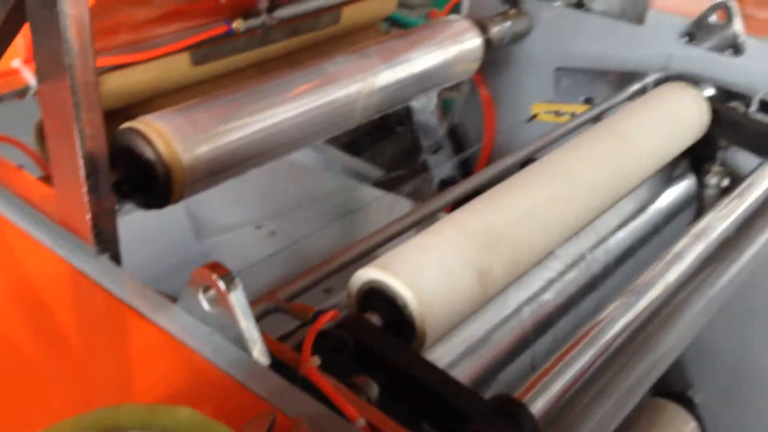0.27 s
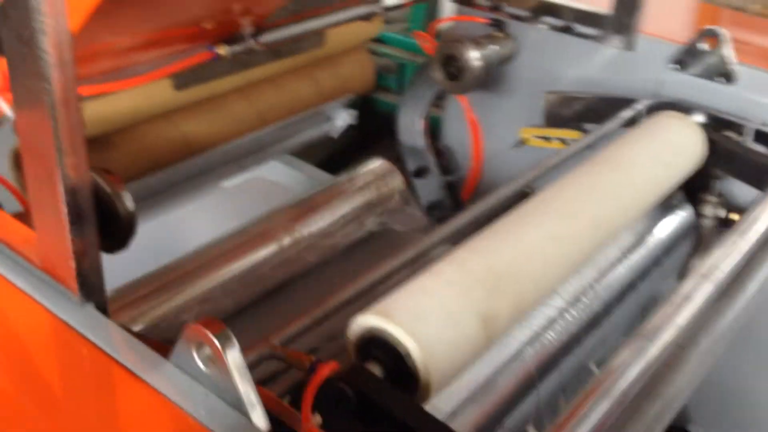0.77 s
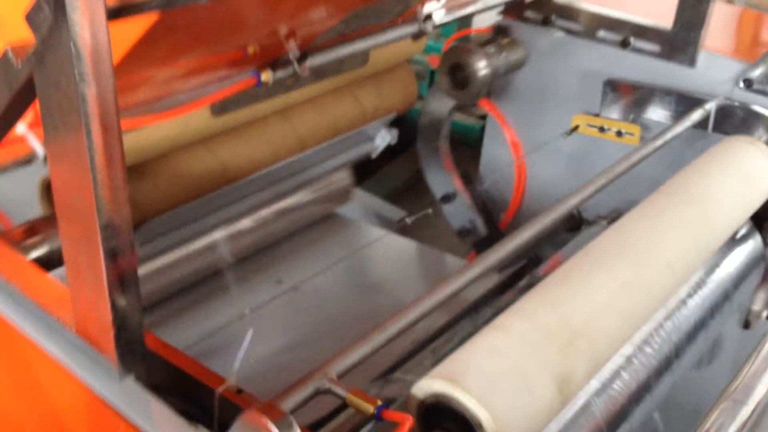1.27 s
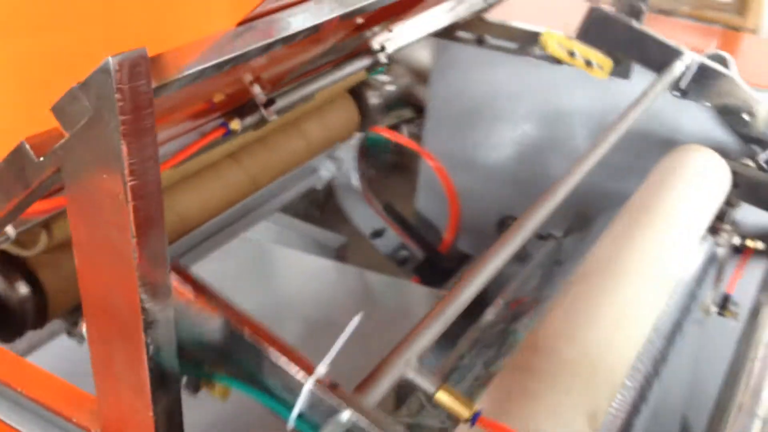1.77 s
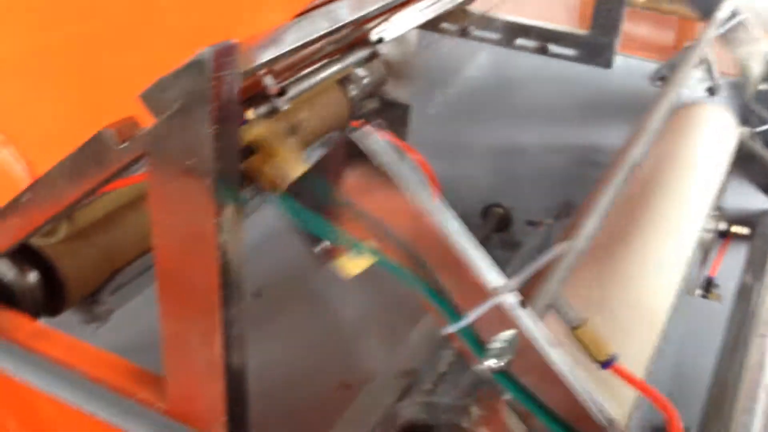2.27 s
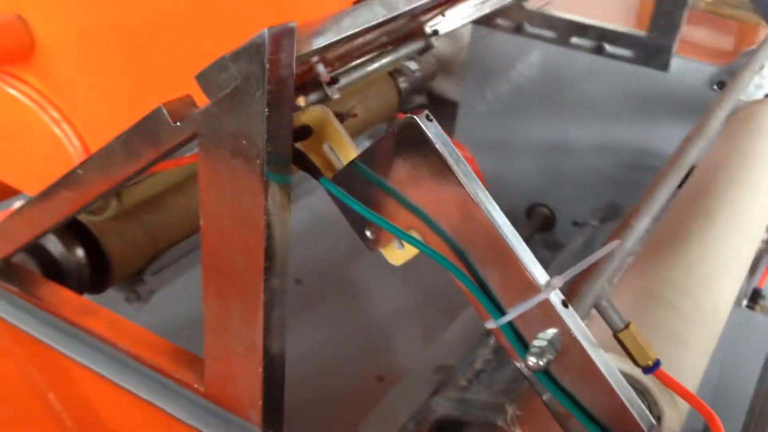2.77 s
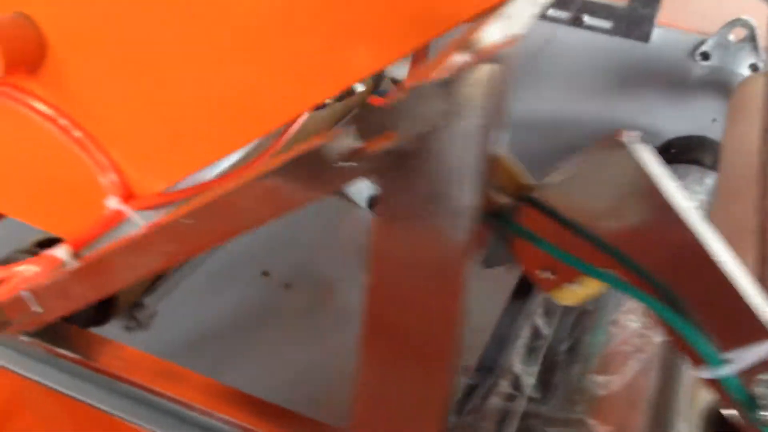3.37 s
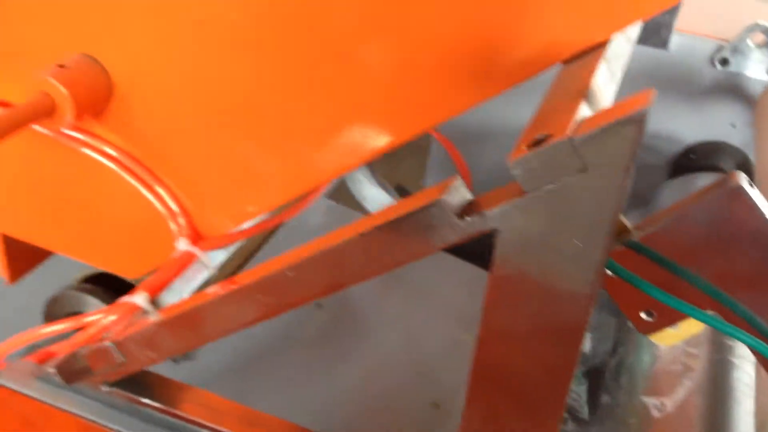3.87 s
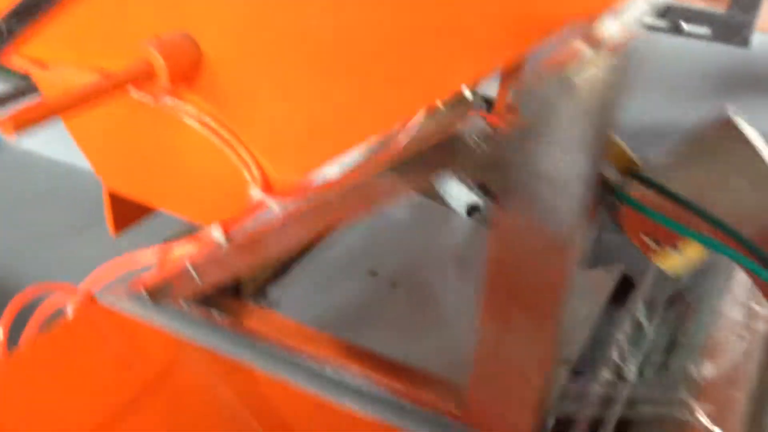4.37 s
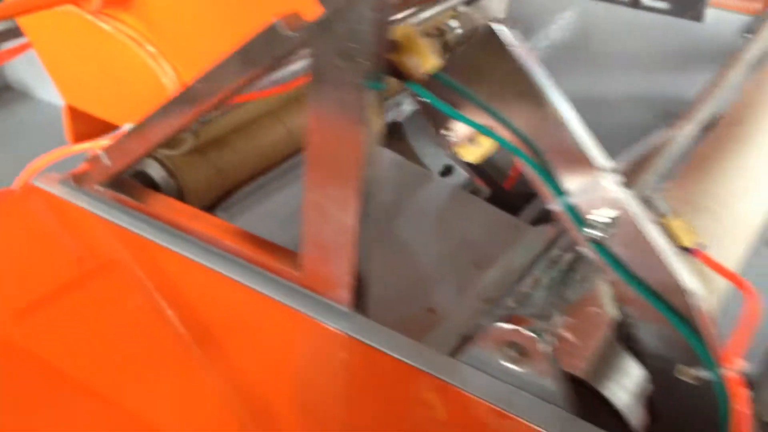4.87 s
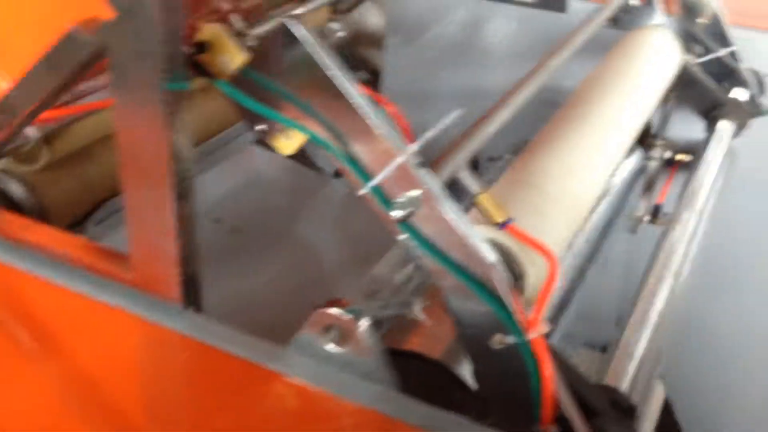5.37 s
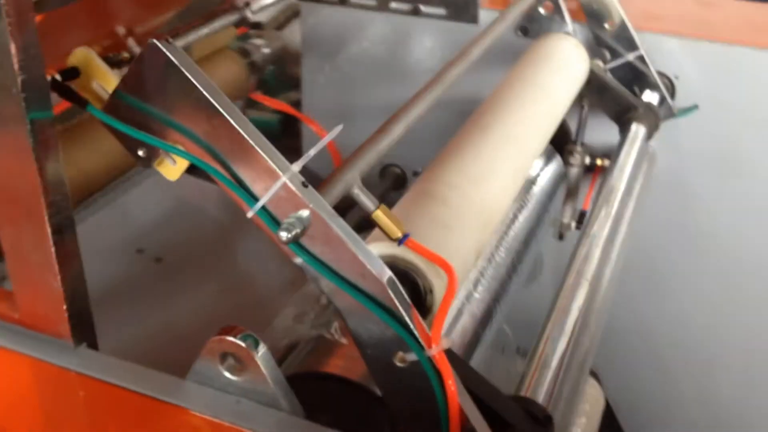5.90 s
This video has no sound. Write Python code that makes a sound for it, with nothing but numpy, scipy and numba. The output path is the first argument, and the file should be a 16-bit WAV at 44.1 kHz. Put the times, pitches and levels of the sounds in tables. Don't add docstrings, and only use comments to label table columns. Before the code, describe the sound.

A rewinding machine heard close up on a phone in an echoing workshop. Air hisses, a blade snaps drily, and a full roll lands with a loud clattering crash and bounces. An arm slams, scrapes and clicks along, then hits its stop with a low ring. Clamp, chuck and latch knock shut with brief air puffs, over hum and thin whine.

```python
import sys
import numpy as np
from scipy import signal
from scipy.fft import rfft, irfft, next_fast_len
from scipy.io import wavfile
from scipy.ndimage import uniform_filter1d
from numba import njit

SR = 44100
rng = np.random.default_rng(int(sys.argv[2]) if len(sys.argv) > 2 else 0)


def file_out(sig):
    cols = np.atleast_2d(sig).T
    lim = np.clip(cols, -1, 1)
    pcm = np.round(lim * 32767).astype(np.int16)
    wavfile.write(sys.argv[1], SR, pcm)


def ratio(d):
    e = np.asarray(d, float) / 20
    return 10 ** e


N = 270774
TIME = np.arange(N) / SR

# pitch_hz [Hz], level_db [dB], fade_s [s to fall 60 dB]
FRAME_MODES = [(157.5, -4.5, 0.39), (227.5, 4.5, 0.21), (268, 5.5, 0.26), (397, -9, 0.22), (458, -7, 0.23),
               (546, 3, 0.25), (740, -4.5, 0.089), (857, -3, 0.074), (996, -8, 0.094), (1640, -24, 0.075),
               (1790, -22, 0.089), (2200, -28, .06)]


def noise():
    return rng.standard_normal(N)


def unit(x):
    return x / np.sqrt(np.mean(x ** 2))


def band(x, lo_hz, hi_hz):
    sos = signal.butter(2, [lo_hz, hi_hz], "band", fs=SR, output="sos")
    return signal.sosfilt(sos, x) * np.sqrt(SR / 2 / (hi_hz - lo_hz))


def colour(x, points):
    hz, db = np.transpose(points)
    size = next_fast_len(N)
    bins_hz = np.arange(size // 2 + 1) * SR / size + 1
    gain = ratio(np.interp(np.log(bins_hz), np.log(hz), db))
    return irfft(rfft(x, size) * gain, size)[:N]


def ring(x, hz, t60):
    r = np.exp(-np.log(1000) / (t60 * SR))
    return signal.lfilter([1 - r, 0, r - 1], [1, -2 * r * np.cos(2 * np.pi * hz / SR), r * r], x)


def walk(rate):
    hold = int(SR / rate)
    steps = np.repeat(rng.standard_normal(N // hold + 1), hold)
    return 1.46 * uniform_filter1d(uniform_filter1d(steps, hold), hold)[:N]


def stroke(s, db, hold_s, release_db_s, attack_s, sag_db_s):
    t = TIME - s
    rise_db = np.where(t < -attack_s, -200, 25 * np.minimum(t, 0) / attack_s)
    sag_db = sag_db_s * np.clip(t, 0, hold_s)
    release_db = release_db_s * np.maximum(t - hold_s, 0)
    return ratio(db + rise_db - sag_db - release_db)


def body(drive, modes, ring_db):
    tones = sum(ratio(db) * ring(drive, hz, t60) for hz, db, t60 in modes)
    return drive + ratio(ring_db) * tones


def blows(table, modes, ring_db, low_hz, crack_db, rise_s=0.00096, first=13.0):
    edges_hz = [(low_hz, 600), (600, 3000), (3000, 8000), (8000, 15000)]
    lasting, lag = [0.91, 0.94, 0.99, 1.0], [1.6, 1.7, 0.64, 0.31]
    power, contact = np.zeros((4, N)), np.zeros((4, N))
    for s, db, thud_db, hard_db, t60 in table:
        start = int(s * SR)
        t = TIME[:min(N - start, int(t60 * SR))]
        for k, rel_db in enumerate((thud_db, 0, hard_db, hard_db + crack_db)):
            rise = 1 - np.exp(-t / (rise_s * lag[k]))
            fade = ratio(-60 * t / max(t60 * lasting[k], 1e-3))
            power[k, start:start + len(t)] += (ratio(db + rel_db - 10) * fade * rise) ** 2
            contact[k, start + int(rise_s * SR)] += first * ratio(db + rel_db - 15.0)
    rattle = ratio(2.2 * walk(450) + 0.8 * walk(90))
    drive = 1e-18
    for p, c, (lo_hz, hi_hz) in zip(power, contact, edges_hz):
        drive = drive + band(c + np.sqrt(p) * rattle * noise(), lo_hz, hi_hz)
    return body(drive, modes, ring_db)


def whistles(table):
    out = np.zeros(N)
    for hz, width_hz, db in table:
        t60 = 2.13 / width_hz
        tone = ring(ring(noise(), hz, t60), hz, t60)
        out += ratio(db + 2.15 * walk(12)) * unit(tone)
    return out


def motor_load():
    # start_s [s], length_s [s], level_db [dB]
    rests = [
        (-0.2, 1.43, -19),
        (-0.2, 2.66, -3.5),
        (1.803, 0.54, 1.5),
        (2.937, 0.48, -25),
        (5.45, 0.4, -3),
    ]
    ramp_s = 0.25
    db = 0
    for s, length_s, rest_db in rests:
        inside_s = np.minimum(TIME - s, s + length_s - TIME)
        db = db + rest_db * np.clip(inside_s / ramp_s + 0.5, 0, 1)
    return ratio(db)


def winder_speed():
    idle_db, run_db, surge_db = -5, -0.2, 5
    start_s, settle_s = 3.78, 0.2
    since = (TIME - start_s) / settle_s
    running_db = run_db + surge_db * np.exp(-np.maximum(since - 1, 0))
    return ratio(idle_db + np.clip(since, 0, 1) * (running_db - idle_db))


def shop():
    # pitch_hz [Hz], level_db [dB per Hz]
    wash_colour = [(15, -63), (25, -20.5), (91, -5.5), (267, -6.5), (297, -5), (509, -8), (1020, -10),
                   (1750, -12.5), (2850, -20.5), (5140, -24.5), (5880, -22.5), (7700, -32.5),
                   (15500, -50.5)]
    # time_s [s], gain_db [dB]
    gain_points = [(0, 3.5), (.6, 5), (1.3, -0.5), (2.4, 2), (2.9, -0.5), (3.6, 2.5), (4.3, 3.5),
                   (4.7, 5.5), (5.1, 4), (6.14, 2.5)]
    # pitch_hz [Hz], width_hz [Hz], level_db [dB]
    drone = [
        (103, 9.5, -52.5),
        (196.9, 14.6, -47.5),
    ]
    # pitch_hz [Hz], width_hz [Hz], level_db [dB]
    inverter = [
        (5840, 51, -55.5),
    ]
    # pitch_hz [Hz], width_hz [Hz], level_db [dB]
    housing = [
        (904.5, 41, -53),
        (1029, 86, -45),
    ]
    # pitch_hz [Hz], width_hz [Hz], level_db [dB]
    motor_tones = [
        (6474, 56, -56.5),
        (9240, 90, -67),
    ]
    # pitch_hz [Hz], width_hz [Hz], level_db [dB]
    winder_tones = [
        (295.4, 11.4, -48.5),
        (447, 10.6, -52.5),
        (2817, 52, -56.5),
        (12700, 140, -84),
        (15000, 130, -72),
    ]
    gain = ratio(np.interp(TIME, *np.transpose(gain_points)))
    wash = ratio(-40.5 + 0.6 * walk(3)) * unit(colour(noise(), wash_colour))
    hum = ratio(-49.5 + 2.6 * walk(4.9)) * np.sin(2 * np.pi * 101.8 * TIME)
    load = motor_load()
    motor = load ** 1.9 * whistles(housing) + load * whistles(motor_tones) + load ** 0.2 * whistles(inverter)
    winder = winder_speed() * whistles(winder_tones)
    return gain * (wash + hum + motor + winder + whistles(drone))


@njit
def hall(x, lags, gain, damp):
    line, soft, out = np.zeros((16, 8192)), np.zeros(16), np.zeros(len(x))
    for i in range(len(x)):
        total = 0.
        for k in range(16):
            soft[k] += (1 - damp) * (gain[k] * line[k, (i - lags[k]) & 8191] - soft[k])
            total += soft[k]
            out[i] += soft[k] * (1 - 2 * (k % 2))
        for k in range(16):
            line[k, i & 8191] = x[i] + soft[k] - total / 8
    return out


def hall_tail(x):
    t60_s, damp, level_db = 1.33, 0.42, -20.5
    lags = (500 * 1.165 ** np.arange(16)).astype(np.int64) | 1
    return ratio(level_db) * hall(x + 1e-18, lags, ratio(-60 * lags / SR / t60_s), damp)


def jolts():
    # start_s [s], level_db [dB], pitch_hz [Hz], fade_s [s to fall 60 dB]
    swings = [
        (0.311, -28, 81, 0.14),
        (.63, -34, 90, 0.091),
        (0.929, -30, 60, .1),
        (1.715, -13, 85, 0.049),
        (1.88, -42, 55, 0.091),
        (2.11, -28, 65, .1),
        (2.46, -32, 50.3, 0.12),
        (2.908, -22, 75, 0.052),
        (2.905, -15, 198, 0.5),
        (2.906, -13.5, 227, 0.76),
    ]
    out = np.zeros(N)
    for s, db, hz, t60 in swings:
        t = np.maximum(TIME - s, 0)
        out += ratio(db - 60 * t / t60) * np.sin(2 * np.pi * hz * t)
    return signal.sosfilt(signal.butter(2, 45, "high", fs=SR, output="sos"), out)


def air():
    # start_s [s, full flow], level_db
    # [dB], throat_db [dB], hold_s [s], release_db_s [dB/s]
    puffs = [(0.0, -31.5, -12, 0.33, 154), (0.342, -43.5, 8.5, 0.003, 198), (1.747, -27.5, 1.5, 0.036, 132),
             (1.936, -34.5, 1, 0.003, 155), (2.131, -27, 3, 0.002, 600), (2.165, -39.5, 14.5, 0.002, 402),
             (3.353, -37.5, -0.5, 0.003, 188), (4.35, -30.5, -0.5, 0.041, 280),
             (5.333, -39, -10, 0.012, 904), (5.35, -28.5, 7.5, 0.0067, 315), (5.6, -60.5, 12, 0.6, 100)]
    attack_s, sag_db_s = 0.014, 2.5
    jet, throat = np.zeros(N), np.zeros(N)
    for s, db, throat_db, hold_s, release in puffs:
        jet += stroke(s, db, hold_s, release, attack_s, sag_db_s)
        throat += stroke(s, db + throat_db, hold_s, release * 0.96, attack_s, sag_db_s)
    hiss = jet * band(noise(), 9900, 17400) + throat * band(noise(), 4170, 9650)
    silencer = 1.3 * (TIME > 3) * ring(hiss, 7840, 0.0016)
    return ratio(0.32 * walk(40)) * (hiss - silencer)


def valve():
    # start_s [s], level_db [dB], thud_db [dB], hardness_db [dB], rattle_s [s]
    knocks = [
        (4.339, -24.5, -1.7, -14, 0.21),
    ]
    # pitch_hz [Hz], level_db [dB], fade_s [s]
    tones = [
        (543, 4, 0.099),
        (2090, -2, 0.082),
    ]
    return blows(knocks, tones, 8.3, 440, crack_db=14, first=9.5)


def clamp():
    # start_s [s], level_db [dB], thud_db [dB], hardness_db [dB], rattle_s [s]
    knocks = [
        (3.461, -10.5, -5, -17, 0.14),
        (3.492, -16.5, 5.5, -4, 0.17),
        (3.539, -28.5, 12.5, -3.5, 0.35),
        (3.599, -49, 2, -15, 0.36),
    ]
    # pitch_hz [Hz], level_db [dB], fade_s [s]
    tones = [(335, -9, 0.17), (421, -2.5, 0.099), (553, -15, 0.13), (1130, 8, 0.016), (1590, 5, 0.011),
             (2430, 5, 0.019), (3280, 4, 0.024), (4400, -4, 0.015), (7900, 1, .012)]
    return blows(knocks, tones, 5.0, 290, crack_db=-10, rise_s=0.0034, first=4.0)


def latch():
    # start_s [s], level_db [dB], thud_db [dB], hardness_db [dB], rattle_s [s]
    knocks = [
        (5.468, -8, -15.5, -14, 0.25),
        (5.499, -12.5, -5, -14, 0.2),
        (5.545, -22.5, 2, -1.5, 0.18),
    ]
    # pitch_hz [Hz], level_db [dB], fade_s [s]
    tones = [(353, 2, 0.18), (415, 4.5, 0.27), (537, 0.5, 0.2), (1030, 1, 0.036), (1265, 1, 0.051),
             (1640, -4, 0.016), (2050, -7, 0.032), (2295, 5, 0.047), (4360, -5.5, 0.0083)]
    return blows(knocks, tones, 5.9, 306, crack_db=-16, rise_s=0.00216, first=2.4)


def chuck():
    # start_s [s], level_db [dB], thud_db [dB], hardness_db [dB], rattle_s [s]
    seating = [
        (4.455, -20.5, 2, 0.5, 0.21),
        (4.488, -24, 2, -3, 0.37),
        (4.537, -16, -4.5, -14, 0.56),
    ]
    # start_s [s], level_db [dB], thud_db [dB], hardness_db [dB], rattle_s [s]
    knocks = [
        (4.576, -4, -6, -6, 0.25),
        (4.61, -10, 5, -24, 0.2),
    ]
    # pitch_hz [Hz], level_db [dB], fade_s [s]
    tones = [(246, -20, 0.073), (355.6, 3.5, 0.21), (412, -7, 0.25), (910, -8, 0.033), (1138, -0.5, 0.015),
             (1588, 2.5, 0.05), (1970, -16, 0.14), (2360, -2, 0.081), (4320, -2, 0.025)]
    return (blows(seating, tones, 2.7, 162, crack_db=-8)
            + blows(knocks, tones, 4.3, 188, crack_db=-4.5, rise_s=0.003))


def chuck_buzz():
    # start_s [s], level_db [dB], pitch_hz [Hz], hold_s [s], release_db_s [dB/s]
    buzzes = [
        (4.613, -12, 422, 0.034, 233),
        (4.735, -21, 419, 0.072, 700),
    ]
    attack_s, sag_db_s, sag_hz_s = 0.018, 75, 150
    wobble, flutter = 1 + 0.02 * walk(60), ratio(2 * walk(50))
    out = np.zeros(N)
    for s, db, hz, hold_s, release in buzzes:
        pitch_hz = (hz - sag_hz_s * np.clip(TIME - s, 0, hold_s)) * wobble
        tone = np.sin(2 * np.pi * np.cumsum(pitch_hz) / SR)
        out += stroke(s, db, hold_s, release, attack_s, sag_db_s) * tone
    return 1.25 * flutter * out


def links():
    # start_s [s], level_db [dB], thud_db [dB], hardness_db [dB], rattle_s [s]
    clicks = [
        (1.682, -33, -20, -17, 0.14),
        (2.05, -22, -14, 10.5, 0.13),
        (2.093, -16.5, -3, -1.5, 0.21),
        (2.129, -8, -16, 4, 0.075),
        (2.166, -24, -23, 9.5, 0.1),
        (2.427, -27, 4.5, -4, 0.093),
    ]
    # start_s [s], level_db [dB], thud_db [dB], hardness_db [dB], rattle_s [s]
    pins = [
        (2.514, -33.5, -8, -2, 0.085),
        (2.781, -29.5, -23, -11, 0.16),
        (2.849, -25, -21, -14, 0.13),
        (3.118, -28.5, -16, 1, 0.15),
        (5.348, -23, -5.5, 1.5, 0.35),
    ]
    # pitch_hz [Hz], level_db [dB], fade_s [s]
    tones = [
        (3950, -2, 0.027),
        (4640, 3, 0.018),
        (5340, 0, 0.021),
        (8200, -15, .02),
    ]
    return (blows(clicks, tones, 5.6, 300, crack_db=-20, rise_s=0.00135)
            + blows(pins, tones, 3.2, 300, crack_db=-1.0, rise_s=0.0039))


def sweep():
    # start_s [s], rumble_db [dB], scrape_db [dB over rumble], hold_s [s], release_db_s [dB/s]
    strokes = [
        (1.716, -12, 1, 0.0018, 302),
        (1.749, -19.5, 4.5, 0.4, 230),
        (2.236, -22.5, -24, 0.0031, 802),
    ]
    attack_s, sag_db_s = 0.012, 16
    judder = ratio(1.4 * walk(59.64))
    rumble, scrape = np.zeros(N), np.zeros(N)
    for s, db, scrape_db, hold_s, release in strokes:
        rumble += stroke(s, db, hold_s, release, attack_s, sag_db_s)
        scrape += stroke(s, db + scrape_db, hold_s, release, attack_s, sag_db_s)
    drive = band(judder * noise() * rumble, 135, 536) + band(judder * noise() * scrape, 560, 3650)
    return ratio(-7.0) * body(drive, FRAME_MODES, 3.2)


def arm():
    # start_s [s], level_db [dB], thud_db [dB], hardness_db [dB], rattle_s [s]
    slams = [
        (1.712, -8, -7.5, -7, 1),
    ]
    # start_s [s], level_db [dB], thud_db [dB], hardness_db [dB], rattle_s [s]
    stops = [
        (2.905, -6.5, -3.5, -6, 0.19),
        (2.935, -14, -24, -11, 0.57),
        (2.979, -18, -7, -14, 0.6),
        (3.039, -24.5, 5.5, -9, 1.09),
    ]
    # pitch_hz [Hz], level_db [dB], fade_s [s]
    tones = [(198, 6, 0.61), (227, 9, 0.23), (257.5, -1, 0.33), (382, -10.5, 0.12), (511, -4.5, 0.072),
             (540, -5, 0.15), (675, -3, 0.1), (800, -4.5, 0.017), (1034, -4, 0.024), (1420, -22, .06),
             (1658, -4, 0.042), (2210, -13, .05)]
    return (blows(slams, FRAME_MODES, 6.9, 140, crack_db=1.5)
            + blows(stops, tones, 8.0, 146, crack_db=0.5, first=5.4))


def roll():
    # start_s [s], level_db [dB], thud_db [dB], hardness_db [dB], rattle_s [s]
    drops = [
        (0.317, -27.5, -9.5, -6, 0.79),
        (0.619, -16.5, 0.5, -2, 0.66),
        (0.635, -7, -13, 0.5, 0.19),
        (0.645, -8, -8, 1.5, 0.12),
        (0.688, -1.5, -8, -4.5, 0.11),
        (0.705, -8.5, -6, 4, 0.21),
        (0.721, -27, -13, -2, 0.34),
    ]
    # start_s [s], level_db [dB], thud_db [dB], hardness_db [dB], rattle_s [s]
    hops = [
        (0.838, -11, -4, -5.5, 0.45),
        (0.862, -27, -8, 1, 0.23),
        (0.899, -11.5, -14, 5, 0.13),
        (0.988, -25.5, 5.5, 4, 0.13),
        (1.152, -45.5, 9, 5.5, 0.78),
    ]
    # pitch_hz [Hz], level_db [dB], fade_s [s]
    tones = [(223, -3, 0.19), (269, -0.5, 0.35), (330, -1, 0.055), (386, -10, 0.27), (795, -24, 0.22),
             (1218, -6, 0.11), (1800, -5.5, 0.029), (2340, -11, 0.018), (3050, -8, 0.0047),
             (4000, -2.5, 0.0082), (4440, -0.5, 0.014), (4740, 1, .03), (5050, 1.5, 0.01), (5500, 0, 0.019),
             (6220, -1, 0.018)]
    return (blows(drops, tones, 4.8, 137, crack_db=-3.5, rise_s=0.0015, first=3.6)
            + blows(hops, tones, 6.0, 127, crack_db=-12, rise_s=0.0064, first=1.5))


def knife():
    # start_s [s], level_db [dB], thud_db [dB], hardness_db [dB], rattle_s [s]
    snaps = [
        (0.489, -7, -30, -7.5, 0.027),
        (0.495, -29, -28, 1, 0.19),
    ]
    # pitch_hz [Hz], level_db [dB], fade_s [s]
    tones = [
        (2030, 15, 0.014),
        (1330, -21, 0.013),
        (2950, 2.5, 0.0035),
        (4820, 3, 0.0086),
        (7460, -22, .005),
    ]
    snap = blows(snaps, tones, 6.7, 450, crack_db=-9, rise_s=0.0008, first=9.4)
    return band(snap, 1200, 17400)


def microphone(x):
    # pitch_hz [Hz], gain_db [dB]
    response = [(30, -4), (150, 6.5), (1200, 0), (2200, 2), (2800, -7.5), (3500, 1.5), (5000, 0),
                (9000, -2), (12000, -6.5), (15000, -8.5)]
    return colour(x, response)


def scene():
    machine = roll() + arm() + sweep() + links() + clamp() + latch() + chuck() + valve() + air()
    snap = knife()
    tail = hall_tail(machine + ratio(-17) * snap)
    near = microphone(snap + machine + tail)
    return (near + jolts() + chuck_buzz() + shop())[None]


def roll_off(x):
    return signal.sosfilt(signal.butter(12, 16520, fs=SR, output="sos"), x)


def record(dry):
    rounded = 0.75 * np.tanh(dry / 0.85)
    top_cut = signal.ellip(8, 0.2, 60, 15050, fs=SR, output="sos")
    mix = signal.sosfilt(top_cut, rounded)
    return roll_off(mix)


dry = scene()
out = record(dry)
file_out(out)
```